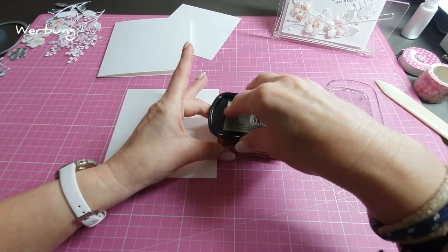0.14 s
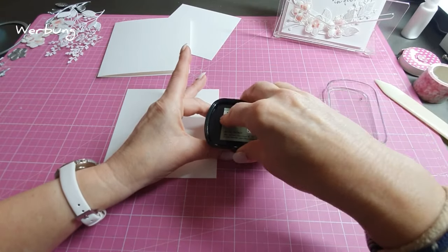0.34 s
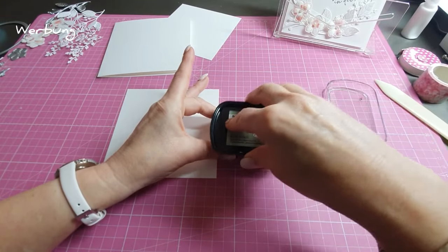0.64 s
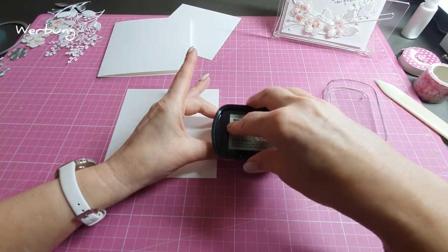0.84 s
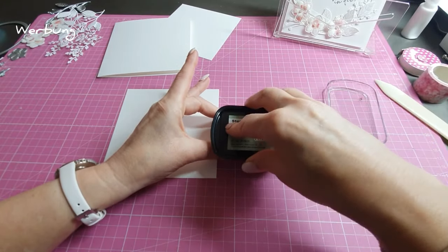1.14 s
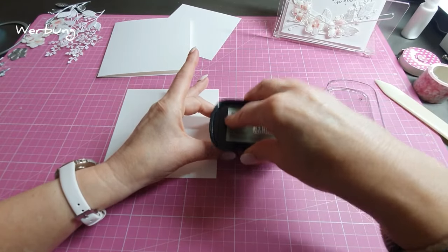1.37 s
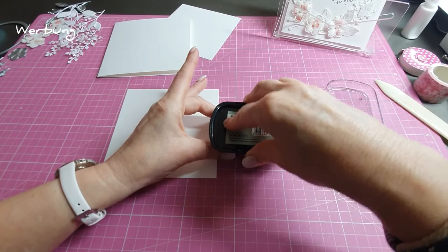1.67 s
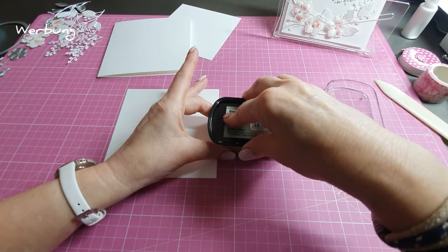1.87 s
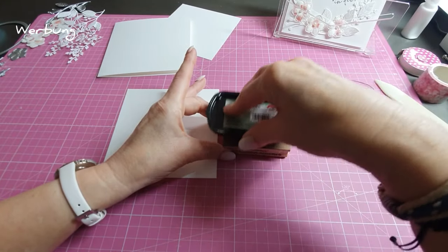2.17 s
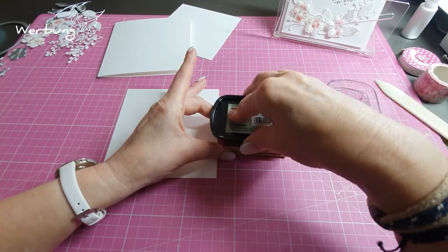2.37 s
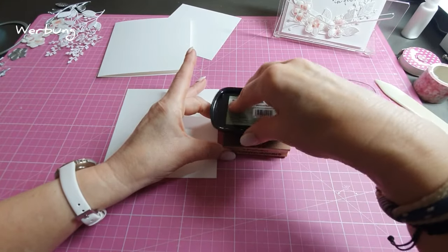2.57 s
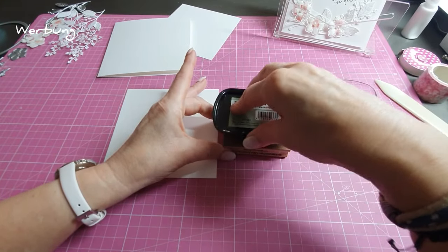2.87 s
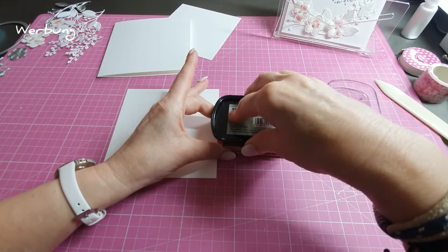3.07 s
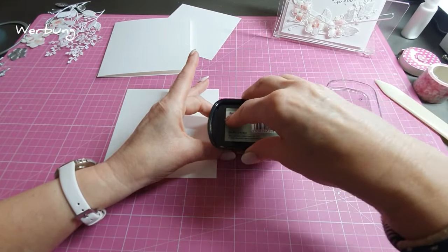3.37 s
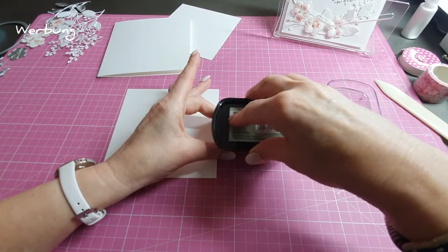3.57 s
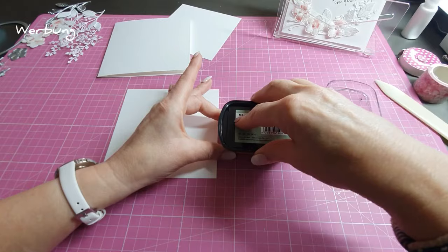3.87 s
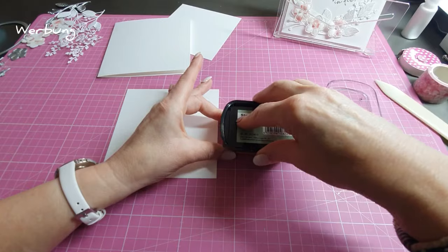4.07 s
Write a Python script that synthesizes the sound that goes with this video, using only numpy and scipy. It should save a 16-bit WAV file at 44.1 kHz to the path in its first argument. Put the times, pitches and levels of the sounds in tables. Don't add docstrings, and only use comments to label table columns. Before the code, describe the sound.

In a small quiet furnished room, a phone above a craft table picks up an ink pad dabbing a wooden stamp on a mat. From 0 to 1.5 s there are eight soft dull thuds about 0.2 s apart, the strongest near 0.4 s, with a slightly longer gap before the last. Each rings the light table top low and briefly, with a short hollow case knock, felt crunch and occasional quick rebound; tiny sticky ink ticks stand out near 0.14 and 1.03 s. Around 1.6-1.7 s an arm slides softly over the mat. An off-centre thud falls at 1.9 s, then faint touches, fibrous brushing and low humming shoves, strongest near 2.4 s. Light contacts at 3.0 and 3.3 s lead to four gentler dabs at 3.5, 3.7, 3.9 and 4.1 s. Wandering low rumble, smooth hiss and a very faint electronic whine continue underneath.

```python
import sys
import numpy as np
from scipy import signal
from scipy.fft import rfft, irfft
from scipy.io import wavfile
from scipy.ndimage import uniform_filter1d

SR = 44100
rng = np.random.default_rng(int(sys.argv[2]) if len(sys.argv) > 2 else 0)


def store_wav(level_fs):
    pcm = np.round(np.clip(np.atleast_2d(level_fs), -1, 1) * 32767)
    wavfile.write(sys.argv[1], SR, pcm.T.astype(np.int16))


def ratio_of_db(decibels):
    return 10 ** (np.asarray(decibels, float) / 20)


N = 186146


def curve(points, hz):
    f_hz, db = np.transpose(points)
    return np.interp(np.log(hz + 1), np.log(f_hz), db)


def colour(x, points, share=0.98):
    size = x.shape[-1]
    gain = ratio_of_db(share * curve(points, np.fft.rfftfreq(size, 1 / SR)))
    return irfft(rfft(x) * gain, size)


def unit(x):
    return x / np.sqrt(np.mean(x ** 2))


def band(x, lo_hz, hi_hz):
    return signal.sosfilt(signal.butter(2, [lo_hz, hi_hz], "bandpass", fs=SR, output="sos"), x)


def walk(rate_hz):
    k = int(SR / rate_hz)
    return unit(uniform_filter1d(uniform_filter1d(rng.standard_normal(N), k), k))


def ring(hz, t60_s, t):
    return (t > 0) * np.sin(2 * np.pi * hz * t) * np.exp(-np.log(1000) * t / t60_s)


def push(ms):
    force = np.hanning(max(int(ms * SR / 1000), 3) + 2)
    return force / force.sum()


def add(out, s, sound):
    i = int(round(s * SR))
    piece = sound[max(-i, 0):N - i]
    start = max(i, 0)
    out[start:start + len(piece)] += piece


def swell(peak_s, db, rise_s, fall_s):
    t = np.arange(N) / SR - peak_s
    return ratio_of_db(db - 20 * np.maximum(-t / rise_s, t / fall_s)) ** 2


def table():
    # (time [s], thud [dB], sway [dB], panel [dB])
    blows = [(-.019, -19, -34.5, -37), (.162, -18.5, -36, -32.5), (.3953, -15, -29.5, -28.5),
             (.6307, -19.5, -31.5, -34.5), (.8286, -22, -30.5, -37), (1.0119, -24, -33, -41.5),
             (1.1963, -18.5, -31, -32.5), (1.4752, -18, -33, -32), (3.5039, -23.5, -35, -40.5),
             (3.6983, -27, -34, -40), (3.8866, -20.5, -33, -35), (4.0865, -26, -36, -44),
             (1.9023, -22.5, -36, -43),
        (2.3354, -34.5, -39.5, -66),
        (2.6981, -36.5, -55, -81),
        (3.0133, -59, -36, -50),
        (3.2723, -33.5, -42, -54),
    ]
    # (frequency [Hz], level [dB], t60 [s], polarity [+-1])
    sway_modes = [(48.2, 0, .5, -1), (55.6, .5, .25, 1), (75, -3, .27, 1)]
    thud_modes = [(88, -15, .21, 1), (121.5, .5, .125, -1), (125.6, -.8, .125, 1), (126, -21, .35, 1)]
    panel_modes = [(163, -1.5, .12, -1), (200, -10, .26, 1), (255, -9, .16, -1), (330, -15, .22, 1)]
    groups = (thud_modes, sway_modes, panel_modes)

    out, t = np.zeros(N), np.arange(int(.6 * SR)) / SR
    clamp = signal.butter(2, 25, "highpass", fs=SR, output="sos")
    rows = blows
    spread = rng.standard_normal((len(rows), sum(len(group) for group in groups)))
    for (s, *levels_db), draws in zip(rows, spread):
        modes = [(*mode, gain_db) for group, gain_db in zip(groups, levels_db) for mode in group]
        sound = np.zeros(len(t))
        for (hz, db, t60_s, sign, gain_db), z in zip(modes, draws):
            delay_s = .043 / np.sqrt(hz)
            sound += sign * ratio_of_db(db + gain_db) * ring(hz, t60_s * (1 + .015 * z), t - delay_s)
        struck = signal.fftconvolve(sound, push(2.))
        add(out, s - .001, signal.sosfilt(clamp, struck))
    return out


def knocks():
    # (time [s], peak [dB], main ring [Hz], brightness [dB], crunch [dB])
    hits = [(0.002, -62, 620, -9, -58), (0.166, -38, 677, -15, -51), (0.4, -37, 790, -2, -42),
            (0.634, -50, 560, -28, -45.5), (0.831, -49.5, 800, -20, -53), (1.017, -60, 533, -19, -48.5),
            (1.2, -38, 653, -9.5, -44.5), (1.479, -36.5, 656, -28, -47), (1.648, -63, 665, -9, -57),
            (1.909, -37.5, 678, -17, -41.5), (2.17, -55, 700, -15, -56.5), (2.337, -66, 910, -5, -54.5),
            (2.705, -63.5, 880, -1, -70), (3.018, -69, 595, -14, -66), (3.034, -46, 620, -14, -55.5),
            (3.278, -54, 730, -10, -65.5), (3.508, -46.5, 650, -14, -57), (3.707, -48, 720, -20, -51.5),
            (3.891, -56, 716, -1, -46), (4.089, -47.5, 620, -22, -49.5)]
    # (time [s], peak [dB], brightness [dB])
    rebounds = [
        (0.1865, -43.5, -10),
        (0.412, -40, -16),
        (0.424, -43, -25),
        (0.645, -60, -15),
        (0.842, -44, -11),
        (1.027, -62, -20),
        (1.211, -40, -11),
        (1.923, -51, -24),
        (3.52, -53, -6),
        (3.903, -60, -10),
    ]
    # (frequency [Hz], level [dB], t60 [s])
    case_modes = [(440, 6, 0.01), (646, -12, 0.02), (930, -8, 0.013), (1110, -14.5, 0.016),
                  (1496, 12.5, 0.0056), (1794, 6, 0.0066), (1910, 4.5, 0.018), (2320, -1.5, 0.024),
                  (3300, -4, 0.0081)]
    # (frequency [Hz], density [dB per Hz])
    crush = [(200, 6), (350, 5.5), (750, -4), (1500, -8), (2500, -19.5), (5000, -24.5), (8000, -30),
             (15000, -38)]

    out, t = np.zeros(N), np.arange(int(.2 * SR)) / SR
    rebound_hz, rebound_crunch_db = 700, -60
    rows = sorted(hits + [(s, db, rebound_hz, bright_db, rebound_crunch_db) for s, db, bright_db in rebounds])
    spread = rng.standard_normal((len(rows), 2, len(case_modes)))
    noise = rng.standard_normal((len(rows), len(t)))
    crunch_rise = 1 - np.exp(-t / 0.00084)
    crunch_decay = ratio_of_db(-60 * t / 0.066) + 0.39 * ratio_of_db(-60 * t / 0.3)
    for (s, db, hz, bright_db, crunch_db), draws, grain in zip(rows, spread, noise):
        sound = -ring(hz, .03, t)
        for (mode_hz, mode_db, t60_s), a, b in zip(case_modes, *draws):
            level_db = mode_db + 1.5 * a + bright_db * (mode_hz > 1400)
            sound += np.sign(b) * ratio_of_db(level_db) * ring(mode_hz * (1 + .03 * b), t60_s, t)
        knock = signal.fftconvolve(sound, push(0.26))[:len(t)]
        crunch = unit(colour(grain, crush)) * crunch_decay * crunch_rise
        add(out, s, ratio_of_db(db - 4.5) * knock + ratio_of_db(crunch_db - 2.0) * crunch)
    return out


def ticks():
    # (time [s], peak [dB], frequency [Hz])
    snaps = [
        (0.1379, -45, 5900),
        (0.4, -54, 4700),
        (0.4364, -64, 4970),
        (0.833, -61, 3800),
        (1.0276, -50.5, 3520),
        (1.479, -53, 5130),
        (3.019, -57, 4960),
        (3.278, -58, 3500),
        (3.508, -59, 4500),
    ]
    out, t = np.zeros(N), np.arange(400) / SR
    rise = 1 - np.exp(-t / .0002)
    for s, db, hz in snaps:
        partials = sum(ring(k * hz, .003, t) for k in (1, 1.4, 1.9, 2.3))
        add(out, s, ratio_of_db(db + 1.5) * rise * partials)
    return out


def brush():
    # (time [s], level [dB], 20 dB fall [s])
    peels = [
        (.15, -74, .5),
        (.47, -70, .3),
        (.65, -71.5, .35),
        (.84, -69, .35),
        (1.025, -70, .3),
        (1.23, -71, .4),
        (3.035, -68.5, .08),
        (3.28, -69, .05),
        (3.7, -67, .08),
    ]
    # (peak time [s], level [dB], 20 dB rise [s], 20 dB fall [s])
    strokes = [
        (1.57, -66.5, .25, .4),
        (1.7, -64, .15, .25),
        (2.06, -73, .5, .5),
        (2.39, -67, .8, .2),
        (2.57, -72, .3, .5),
    ]
    # (peak time [s], level [dB], 20 dB rise [s], 20 dB fall [s])
    shoves = [
        (2.02, -69, .01, .045),
        (2.2, -69, .06, .3),
        (2.42, -60.5, .5, .065),
        (2.66, -68.5, .25, .12),
        (2.96, -71, .15, .03),
    ]

    peel = sum(swell(s, db, .015, fall_s) for s, db, fall_s in peels)
    stroke = sum(swell(*row) for row in strokes)
    shove = sum(swell(*row) for row in shoves)
    slips = rng.standard_normal((3, N)) * ratio_of_db(1.5 * rng.exponential(size=(3, N)))

    rest_hiss_db, rest_drag_db = -76.5, -78
    hiss = unit(band(band(slips[0], 3000, 6800), 2800, 7000)) * ratio_of_db(1.6 * walk(40))
    hiss *= np.sqrt(peel + stroke + ratio_of_db(rest_hiss_db) ** 2)

    peel_drag_db, stroke_drag_db = 10.5, 5
    drag = unit(colour(slips[1], [(200, -13), (400, -3), (800, -2), (1500, -11), (2500, -20), (6000, -33)]))
    drag *= ratio_of_db(1.5 * walk(40))
    drag_power = ratio_of_db(peel_drag_db) ** 2 * peel + ratio_of_db(stroke_drag_db) ** 2 * stroke
    drag *= np.sqrt(drag_power + ratio_of_db(rest_drag_db) ** 2)

    hum = unit(band(band(slips[2], 270, 403), 270, 403)) * np.sqrt(shove)
    return ratio_of_db(-0.5) * hiss + ratio_of_db(-5.5) * drag + ratio_of_db(-0.5) * hum


def echo(x):
    t = np.arange(int(.4 * SR)) / SR
    t60_s, level_db = .3, -15
    low = band(rng.standard_normal(len(t)), 162, 1580)
    high = band(rng.standard_normal(len(t)), 1160, 5100)
    tail = low * ratio_of_db(-60 * t / t60_s) + .5 * high * ratio_of_db(-60 * t / (0.58 * t60_s))
    tail *= 1 - np.exp(-t / 0.007)
    tail /= np.sqrt(np.sum(tail ** 2))
    return ratio_of_db(level_db) * signal.fftconvolve(x, tail)[:N]


def room(hits):
    # (frequency [Hz], density [dB per Hz])
    noise_floor = [(22, -18.5), (35, 0.5), (60, -8), (130, -12), (300, -26.5), (600, -36.5), (1400, -35),
                   (1800, -39), (2800, -40.5), (3300, -41), (6500, -42), (7500, -43.5), (13000, -40.5),
                   (15500, -38.5)]
    # (frequency [Hz], level [dB])
    whine = [(3001, -92), (4000, -94), (5000, -95), (7018, -98), (10341, -98), (11341, -99)]

    mid, side = colour(rng.standard_normal((2, N)), noise_floor)
    loud_db = 10 * np.log10(uniform_filter1d(hits ** 2, 2000, origin=900) + 1e-9)
    opening = np.clip((loud_db + 54) / 11.0, 0, 1)
    floor_db = -58.5
    scale = ratio_of_db(floor_db + 2.5 * opening) / np.std(mid)
    rumble = band(mid, 22, 70) * (ratio_of_db(2.5 * walk(4)) - 1)
    t = np.arange(N) / SR
    lines = sum(ratio_of_db(db + 5.5) * np.sin(2 * np.pi * hz * t) for hz, db in whine)
    apart = colour(side, [(100, -37), (1000, -19), (3000, -19), (3600, -7), (6500, -35), (7500, -15)])
    return scale * (mid + rumble) + lines, scale * apart * np.array([[1], [-1]])


def stereo(x, balance):
    return np.array([colour(x, balance, share=.5), colour(x, balance, share=-.5)])


def scene():
    # (frequency [Hz], level [dB])
    hit_balance = [(45, -.2), (100, -.7), (200, -.7), (380, -1.5), (1300, -3), (2400, -3), (4400, -2),
                   (8000, -4)]
    air_balance = [(60, -.5), (150, -2), (350, -6), (2700, -6), (3200, -1.5), (6600, -1.5), (7200, -8),
                   (12800, -8), (13500, -4)]

    hard = knocks() + ticks()
    hits = table() + hard
    air, apart = room(hits)
    reflected = echo(hard + ratio_of_db(-2.5) * band(hits, 165, 360))
    return stereo(hits, hit_balance) + stereo(air + brush() + reflected, air_balance) + apart


def top_cut(x):
    return signal.sosfilt(signal.butter(12, 16450, fs=SR, output="sos"), x)


def record(dry):
    top = signal.ellip(8, .1, 40, 15760, fs=SR, output="sos")
    mix = signal.sosfiltfilt(top, dry)
    return top_cut(mix)


dry = scene()
out = record(dry)
store_wav(out)
```